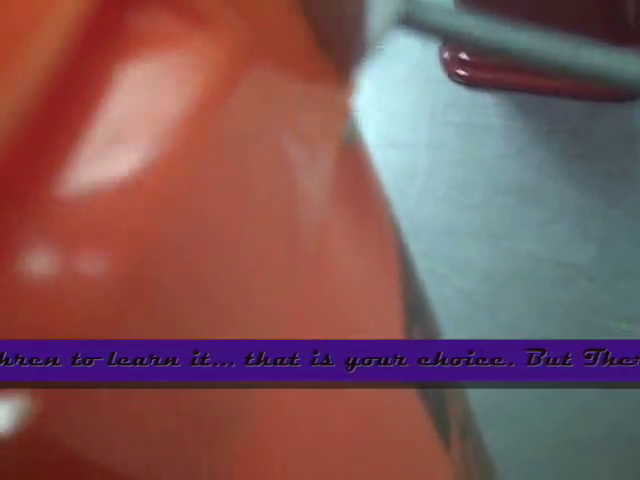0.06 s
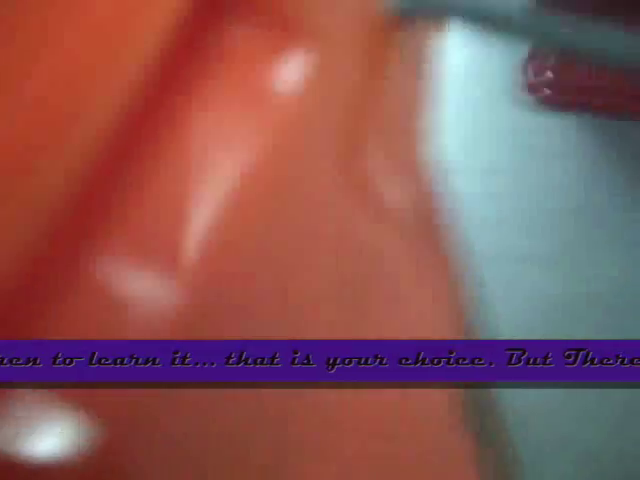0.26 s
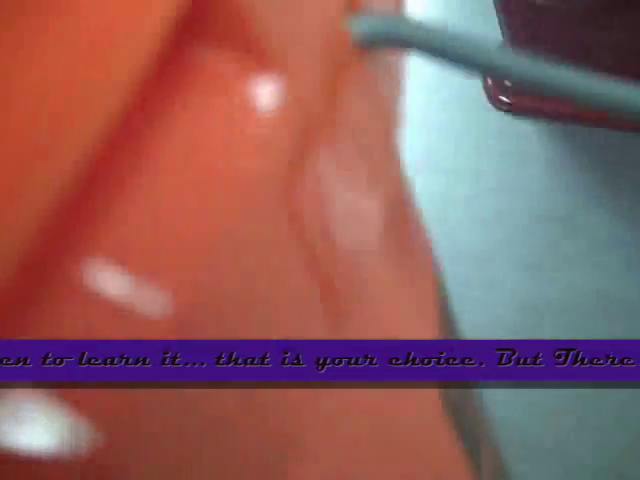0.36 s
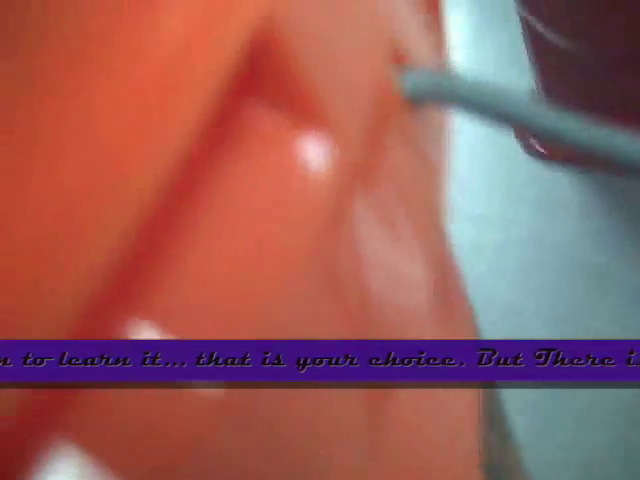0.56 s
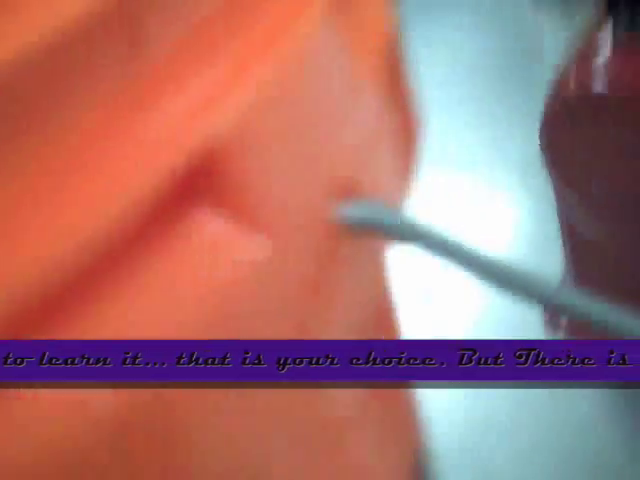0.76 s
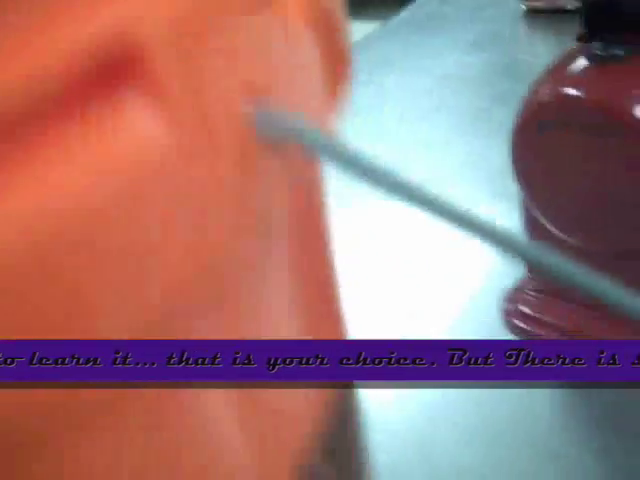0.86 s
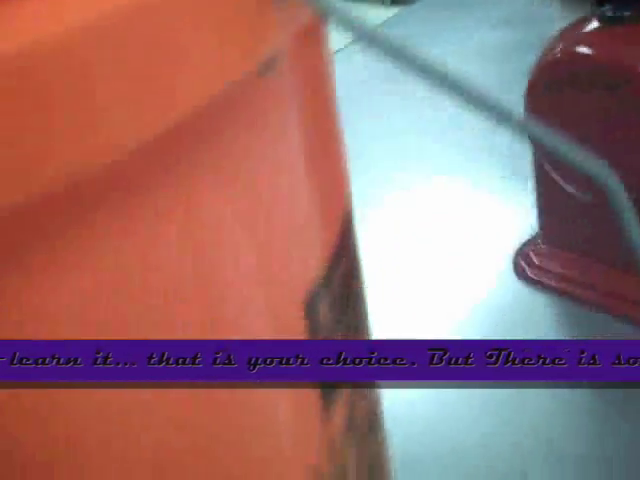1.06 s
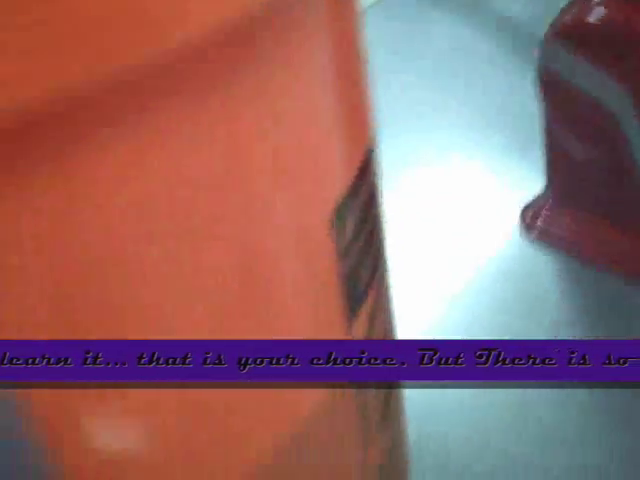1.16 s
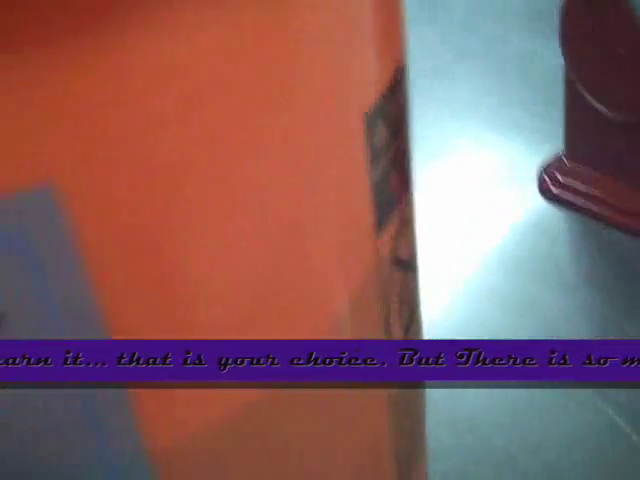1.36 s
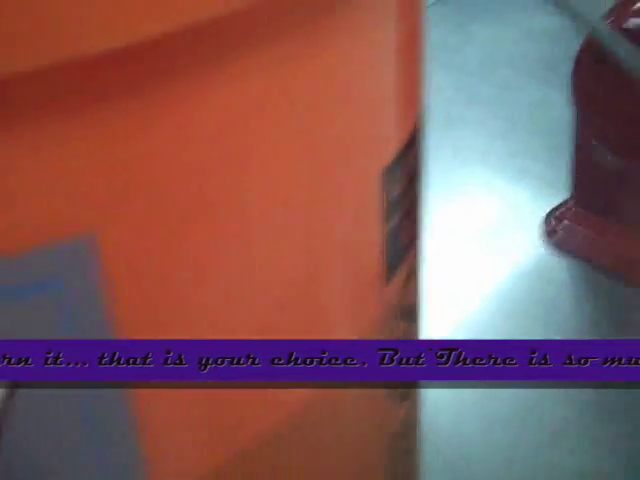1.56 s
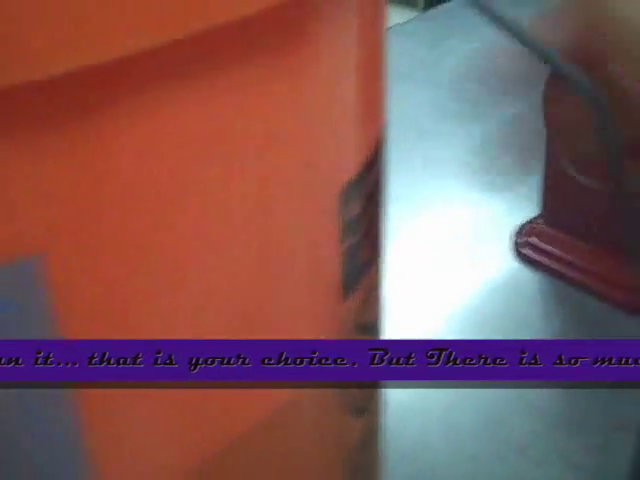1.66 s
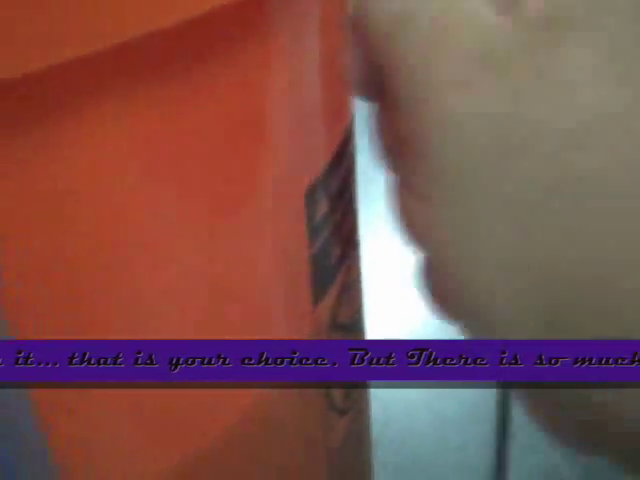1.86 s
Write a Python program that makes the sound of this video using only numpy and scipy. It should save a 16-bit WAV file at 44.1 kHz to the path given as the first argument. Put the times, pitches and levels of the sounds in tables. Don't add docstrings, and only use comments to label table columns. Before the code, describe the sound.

A metal wire handle rattles and knocks hard against a plastic bucket, then slaps its rim

```python
import sys
import numpy as np
from scipy import signal
from scipy.fft import rfft, irfft, next_fast_len
from scipy.io import wavfile
from scipy.ndimage import map_coordinates

SR = 44100
rng = np.random.default_rng(int(sys.argv[2]) if len(sys.argv) > 2 else 0)


def gain_from_db(level_db):
    decades = np.asarray(level_db, float) / 20
    return 10 ** decades


def to_wav(s):
    ch = np.atleast_2d(s).T
    pcm = np.round(np.clip(ch, -1, 1) * 32767)
    wavfile.write(sys.argv[1], SR, pcm.astype(np.int16))


N = 83790


def unit(x):
    return x / np.sqrt(np.mean(x ** 2) + 1e-20)


def along(points, hz):
    f, v = np.transpose(points)
    return np.interp(np.log(hz + 1), np.log(f + 1), v)


def curve(rows):
    return np.interp(np.arange(N) / SR, *np.transpose(rows))


def filtered(x, response):
    m = next_fast_len(len(x) + 8192)
    return irfft(rfft(x, m) * response(np.fft.rfftfreq(m, 1 / SR)), m)[:len(x)]


def coloured(spectrum, size):
    return unit(filtered(rng.standard_normal(size), lambda hz: gain_from_db(along(spectrum, hz))))


def resonance(hz, centre_hz, width_hz):
    damping = 1j * hz * width_hz
    return damping / (centre_hz ** 2 - hz ** 2 + damping)


def add(track, start_s, sound):
    part = track[round(start_s * SR):][:len(sound)]
    part += sound[:len(part)]


def ring(hz, t60_s, t, rise_s=0.000099):
    return np.sin(2 * np.pi * hz * t) * gain_from_db(-60 * t / t60_s) * (1 - np.exp(-t / rise_s))


def flutter(size):
    depth_db, rate_hz = 1.5, 59.5
    knots = rng.standard_normal(size // 100 + 4)
    return gain_from_db(depth_db * map_coordinates(knots, [np.arange(size) * rate_hz / SR]))


# start_s, level_db
DRONE_GAIN = [(0, -43.5), (.2, -47.5), (.6, -55), (.75, -54), (1.4, -51.5), (1.9, -50.5)]
# pitch_hz, density_db (per Hz)
AIR_COLOUR = [(30, -47), (90, -46.5), (114, -18), (262, -14.5), (386, -13), (673, -5), (782, -17.5),
              (852, -12), (15000, -52)]
# pitch_hz, width_hz, level_db
DUCT_MODES = [(156, 8.8, -7.5), (265, 20.3, -7.5), (560, 16, -9), (699, 25, -2), (793, 40, -6.5)]


def drone():
    duct_db, hum_hz, hum_db = -4.5, 694, -4

    def duct_response(f):
        return sum(gain_from_db(db) * resonance(f, hz, width) for hz, width, db in DUCT_MODES)

    air = coloured(AIR_COLOUR, size=N)
    duct = gain_from_db(duct_db) * unit(filtered(rng.standard_normal(N), duct_response))
    hum = gain_from_db(hum_db) * flutter(N) * np.sin(2 * np.pi * hum_hz * np.arange(N) / SR)
    return gain_from_db(curve(DRONE_GAIN)) * (air + duct + hum)


# start_s, level_db
SLIDE_LEVEL = [(0, -47), (.2, -44), (.36, -61), (.38, -27), (.45, -53), (.6, -56), (.805, -68),
               (.82, -51.5), (.875, -67), (1.25, -74), (1.4, -56), (1.415, -38), (1.46, -47.5), (1.49, -35),
               (1.59, -36.5), (1.68, -35), (1.78, -41.5), (1.9, -51)]
# pitch_hz, density_db (per Hz)
RUB_COLOUR = [(90, -33.5), (250, 8), (700, 8), (2000, 7), (3500, -3.5), (6000, -8), (10000, -13.5),
              (15000, -37.5)]


def scrape():
    slips_per_s, slip_spread_db, smooth_share, trim_db = 3900, 1, 0.89, -0.5
    freed_s, sing_db, sing_width_hz = 1.5, -17.5, 39
    slip_now = rng.random(N) < slips_per_s / SR
    slip_size = gain_from_db(slip_spread_db * rng.exponential(size=N))
    slips = unit(slip_now * slip_size * rng.standard_normal(N))
    rough = slips + smooth_share * rng.standard_normal(N)
    rub = unit(filtered(rough, lambda hz: gain_from_db(along(RUB_COLOUR, hz))))

    def wire_response(f):
        return sum(resonance(f, hz, sing_width_hz) for hz, _, _ in ACROSS_MODES + ALONG_MODES)

    free_slips = slips * (np.arange(N) > freed_s * SR)
    singing = gain_from_db(sing_db) * unit(filtered(free_slips, wire_response))
    return gain_from_db(curve(SLIDE_LEVEL) + trim_db) * (rub + singing)


# pitch_hz, density_db (per Hz)
CRACK_COLOUR = [(100, -39), (400, 3), (1500, 3), (3600, -2), (5500, -7.5), (9000, -12), (14400, -19),
                (15600, -32)]


def contacts(rows, tilt_db=0, side_db=-5):
    wall_t60_s, wall_rise_s, wall_top_hz = 0.019, 0.00033, 3700
    log_scatter, bright_share = 0.352, 0.17
    crack_t60_s, crack_rise_s, snap_t60_s, snap_db = 0.026, 0.00062, 0.0052, 1
    out, t = np.zeros(N), np.arange(SR // 8) / SR
    colour = [(hz, db + tilt_db * np.log2(hz / 1000)) for hz, db in CRACK_COLOUR]
    crack_shape = gain_from_db(-60 * t / crack_t60_s) + gain_from_db(snap_db - 60 * t / snap_t60_s)
    crack_shape = crack_shape * (1 - np.exp(-t / crack_rise_s))
    for start_s, db, hz, bright_db in rows:
        near_hz = hz * np.exp(log_scatter * rng.normal(size=(16, 1)))
        near_hz = np.minimum(near_hz, wall_top_hz * rng.uniform(.7, 1, (16, 1)))
        neighbours = rng.normal(size=(16, 1)) * ring(near_hz, wall_t60_s, t, wall_rise_s)
        crowd = neighbours.sum(axis=0) / 4
        wall = ring(hz, wall_t60_s, t, wall_rise_s) + gain_from_db(side_db + bright_share * bright_db) * crowd
        crack = coloured(colour, size=len(t)) * gain_from_db(bright_db - 8.5) * crack_shape
        add(out, start_s, gain_from_db(db) * (wall / np.hypot(1, gain_from_db(bright_db)) + crack))
    return out


# start_s, peak_db, pitch_hz (wall), brightness_db
TICKS = [
    (.15, -36, 3360, 5.5),
    (.1907, -28, 1520, -6),
    (.7512, -40.5, 1860, -1.5),
    (.8135, -36, 1310, -19),
    (.8145, -41, 2460, -13),
    (.8348, -39, 2420, -13),
    (.8967, -42.5, 2530, -17),
    (1.0222, -32, 2494, -25),
]


def hook_ticks():
    return contacts(TICKS, side_db=-14)


# start_s, peak_db, pitch_hz, push_db (air)
THUDS = [(0.21, -29, 100, 2), (0.228, -18, 820, -36), (0.28, -5, 280, -35), (0.299, -5.5, 696, -11),
         (0.333, -12.5, 830, -32), (0.39, -14, 310, -17), (0.559, -30.5, 460, -32),
         (1.416, -26, 154, -21.5), (1.466, -23, 340, -24), (1.482, -22, 253, -23), (1.41, -36, 420, -24),
         (.2295, -16.5, 208.5, -16), (1.68, -31, 330, -40), (1.522, -34, 670, -20), (1.58, -23.5, 360, -16),
         (1.671, -30, 716, -45), (1.467, -19.5, 807, -40)]


def body_thuds():
    t60_s, push_s = 0.025, 0.0024
    out, t = np.zeros(N), np.arange(SR // 6) / SR
    push = t / push_s * np.exp(1 - t / push_s)
    for start_s, db, hz, push_db in THUDS:
        add(out, start_s, gain_from_db(db) * (ring(hz, t60_s, t) + gain_from_db(push_db) * push))
    return out


# start_s, peak_db, pitch_hz (wall), brightness_db
KNOCKS = [(.2107, -13, 1590, 4.5), (.2142, -2, 3310, -0.5), (.2150, -15.5, 1340, -1),
          (.2195, -18, 3060, -6.5), (.2250, -15, 1870, -7), (.2272, -8, 2730, -3), (.2294, -5, 2210, 2.5),
          (.2312, -7.5, 2830, -4), (.2335, -4.5, 1764, -6.5), (.2376, -1, 2508, -8.5),
          (.2410, -9.5, 2260, -10), (.2440, -10.5, 2500, -5.5), (.2505, -13, 1580, -8),
          (.2522, -18, 2480, -8), (.2768, -1, 3230, 1), (.2790, -4, 1270, 1), (.2830, -1, 1794, -7),
          (.2865, -4, 1443, -17), (.2910, -12, 1720, -21), (.2925, -10.5, 2610, -4), (.2996, -4.5, 3460, 1),
          (.3012, -4.5, 2220, -3.5), (.3065, -15.5, 1250, -11), (.3118, -9, 2540, -9),
          (.3230, -14, 1490, -13), (.3330, -2.5, 1845, -5.5), (.3375, -17.5, 1740, -14),
          (.3635, -13, 2120, 0.5), (.3712, -14, 1660, -7), (.3745, -13.5, 1690, -3),
          (.3780, -18, 2580, 4.5), (.3855, -22, 2460, -8), (.3882, -4.5, 2540, -4.5),
          (.3972, -10, 1322, -12), (.4005, -19, 2480, -4), (.4030, -12, 1497, -10),
          (.4075, -18.5, 1220, -4), (.4115, -17.5, 2210, 1), (.4155, -22, 1510, 5), (.4220, -22, 1490, -15),
          (.4300, -21, 3060, -14), (.4590, -31, 2630, -12), (.4775, -24, 1590, -5),
          (.4790, -21.5, 2900, -6), (.4963, -20, 2550, -1.5), (.5108, -20.5, 1530, 0.5),
          (.5145, -20, 2466, -9), (.5280, -25, 2520, -15), (.5605, -30.5, 1620, -16),
          (.5640, -35, 2500, -11.5)]


def hook_knocks():
    return contacts(KNOCKS)


# pitch_hz, level_db, t60_s
ACROSS_MODES = [(1599, -9.5, 0.13), (2374, -11, 0.16), (3193, -9, 0.52), (3973, -6.5, .3), (5498, -6, 0.37),
                (6702, -14, 0.42), (7580, -6.5, 0.23), (9120, -10, 0.2), (10630, -11, .2), (11400, -11, .1),
                (12430, -7, 0.23), (13870, -5, .15), (15430, -14, .15)]
# pitch_hz, level_db, t60_s
ALONG_MODES = [(799, -17, .2), (3192, -11, 0.13), (4597, 0, 0.72), (6270, -1, 0.21), (8330, -15, 0.093),
               (11050, -11, .15), (11495, -16, .2), (12800, -12, .3)]
# pitch_hz, level_db, t60_s
HOOKED_MODES = [(328, -10, 0.44), (1365, 3, 0.24), (1473, 0, .11), (1883, 0, 0.19), (2420, -2.5, 0.22),
                (2570, -2.5, 0.18), (3000, -6.5, .3), (4900, -22, 0.2)]
# start_s, level_db, free_s (until muted)
ACROSS_HITS = [
    (1.41, -32, 0.015),
    (1.42, -31, 0.039),
    (1.607, -34, 0.055),
    (1.675, -36.5, 0.053),
]
# start_s, level_db, free_s
ALONG_HITS = [
    (1.471, -30, .011),
    (1.4822, -26, .041),
    (1.4822, -33, .112),
]
# start_s, level_db, free_s
HOOKED_HITS = [
    (0.335, -49, 0.086),
    (.396, -29, 0.035),
    (.512, -41.5, 0.026),
    (.815, -51.5, 0.055),
]
# start_s, pitch_hz, level_db, free_s
GLANCES = [(.386, 12900, -40, .06), (0.514, 2950, -42.5, 0.063), (.53, 7930, -63, 0.21),
           (1.569, 11495, -41, .03), (1.608, 11495, -38, 0.058), (1.608, 6570, -33, 0.024),
           (1.640, 5498, -37.5, 0.054), (1.642, 4020, -45, 0.028), (1.691, 6702, -43, 0.083),
           (1.697, 5498, -48, .04), (1.70, 7920, -40, 0.041), (1.742, 3225, -43, 0.076)]
# start_s, pitch_hz, level_db, free_s
LONG_GLANCES = [
    (.336, 4480, -38, .13),
    (.400, 322, -31, .05),
    (.396, 1100, -31, .025),
    (.42, 2417, -32, .045),
    (1.024, 2420, -50, .012),
    (.815, 5020, -62, .04),
    (.845, 3650, -65, .045),
    (.845, 4500, -66, .015),
    (1.695, 13870, -49, .025),
    (.40, 5020, -42, .055),
]


def wire():
    mute_s, twin_db, split_hz = 0.0058, -11.5, 41.8
    glance_t60_s, long_t60_s = 0.37, 0.9
    out, t = np.zeros(N), np.arange(SR // 4) / SR
    strikes = [(ACROSS_MODES, *hit) for hit in ACROSS_HITS]
    strikes += [(ALONG_MODES, *hit) for hit in ALONG_HITS]
    strikes += [(HOOKED_MODES, *hit) for hit in HOOKED_HITS]
    strikes += [([(hz, 0, glance_t60_s)], s, db, free_s) for s, hz, db, free_s in GLANCES]
    strikes += [([(hz, 0, long_t60_s)], s, db, free_s) for s, hz, db, free_s in LONG_GLANCES]
    for modes, start_s, db, free_s in strikes:
        tone = np.zeros(len(t))
        for hz, mode_db, t60_s in modes:
            twin = gain_from_db(twin_db) * ring(hz + split_hz * rng.normal(), t60_s, t)
            tone += gain_from_db(mode_db) * flutter(len(t)) * (ring(hz, t60_s, t) + twin)
        add(out, start_s, gain_from_db(db) * tone * np.exp(-np.maximum(t - free_s, 0) / mute_s))
    return out


# start_s, peak_db, pitch_hz (wall), brightness_db
SLAPS = [(.369, -27.5, 2500, 14.5), (1.4082, -19, 3400, 4), (1.412, -25, 1620, 10),
         (1.4165, -27.5, 3230, 12.5), (1.486, -17.5, 1500, -3), (1.4651, -10.5, 836, 3.5),
         (1.4684, -12.5, 1790, 7), (1.4814, -11.5, 793, 3.5), (1.5214, -15.5, 644, -1.5),
         (1.5653, -26.5, 3340, 11.5), (1.5963, -25, 2300, 13.5), (1.6044, -17.5, 2120, 7.5),
         (1.6394, -50, 2970, 8), (1.6706, -19, 700, 4.5), (1.6934, -35, 3144, 13), (1.7165, -24, 793, 3),
         (1.7494, -36, 3330, 12), (1.8297, -28.5, 2350, 0.5), (1.8305, -32, 1520, -6),
         (1.679, -27.5, 950, 11.5), (1.840, -33, 2280, 8)]


def rim_slaps():
    return contacts(SLAPS, tilt_db=4)


# pitch_hz, t60_s
ROOM_DECAY = [(100, 0.28), (300, 0.53), (1000, 0.46), (2800, 0.43), (14000, 0.44)]


def room(x):
    wall_gap_s = 0.006
    out, step = np.zeros(N), SR // 25
    for start in range(0, N, step):
        hz, t, z = signal.stft(rng.standard_normal(SR // 2), SR, nperseg=256)
        fade = gain_from_db(-60 * t / along(ROOM_DECAY, hz)[:, None])
        tail = signal.istft(z * fade, SR, nperseg=256)[1]
        echoes = signal.fftconvolve(x[start:start + step], tail / np.linalg.norm(tail))
        add(out, start / SR + wall_gap_s, echoes)
    return out


def scene():
    room_db, tick_wet_db, wire_wet_db = -9.5, -9, -7
    bucket = hook_knocks() + rim_slaps() + body_thuds()
    ticks, steel = hook_ticks(), wire()
    wet = room(bucket + gain_from_db(tick_wet_db) * ticks + gain_from_db(wire_wet_db) * steel)
    return (bucket + ticks + steel + gain_from_db(room_db) * wet + scrape() + drone())[None]


def low_pass(x):
    return signal.sosfilt(signal.butter(12, 16450, fs=SR, output="sos"), x)


def record(dry):
    low_cut_hz, top_hz, top_width_hz = 104, 15470, 300
    x = filtered(dry[0], lambda hz: 1j * hz / (low_cut_hz + 1j * hz))
    x = x / (1 + np.abs(x) ** 4) ** (1 / 4)
    mix = filtered(x, lambda hz: gain_from_db(-20 * np.maximum(hz - top_hz, 0) / top_width_hz))
    return low_pass(mix[None])


dry = scene()
out = record(dry)
to_wav(out)
```